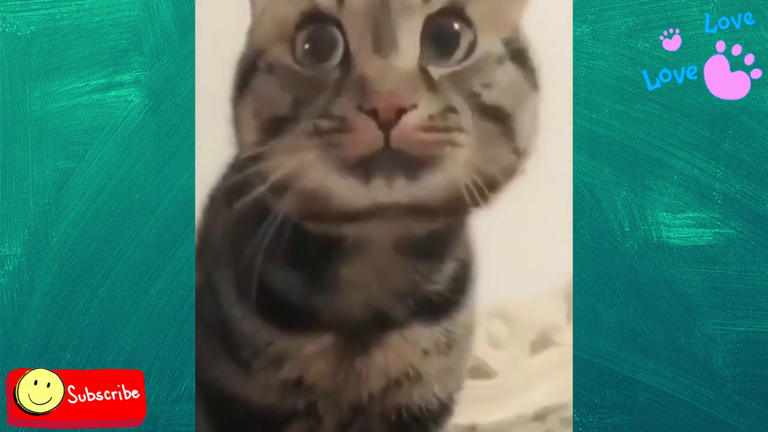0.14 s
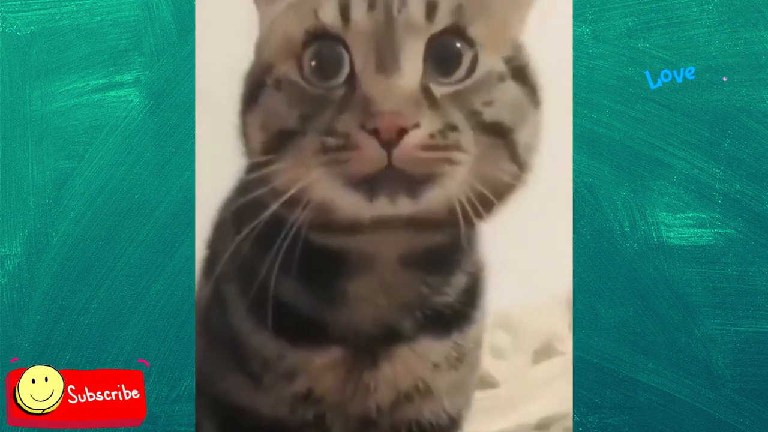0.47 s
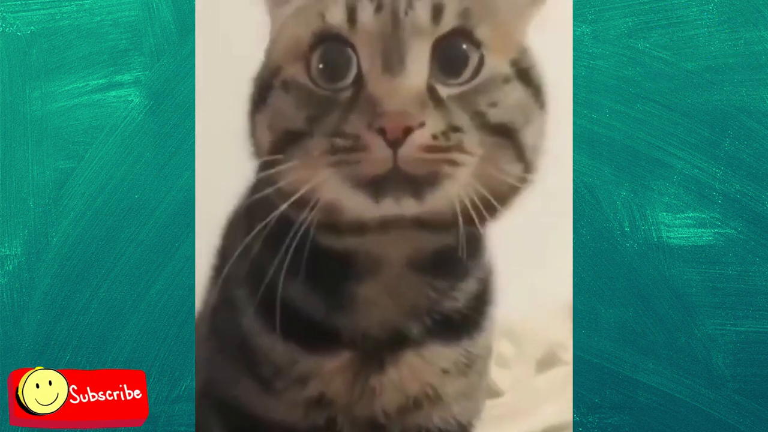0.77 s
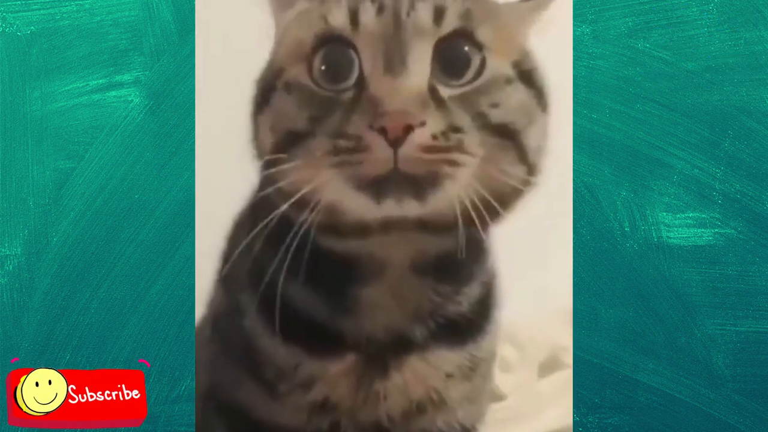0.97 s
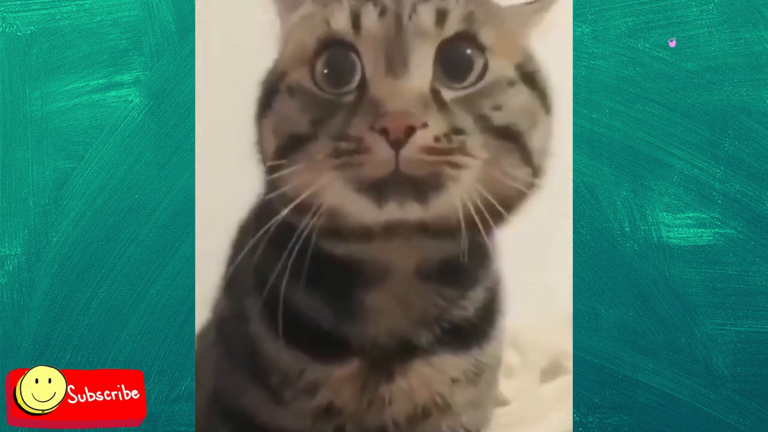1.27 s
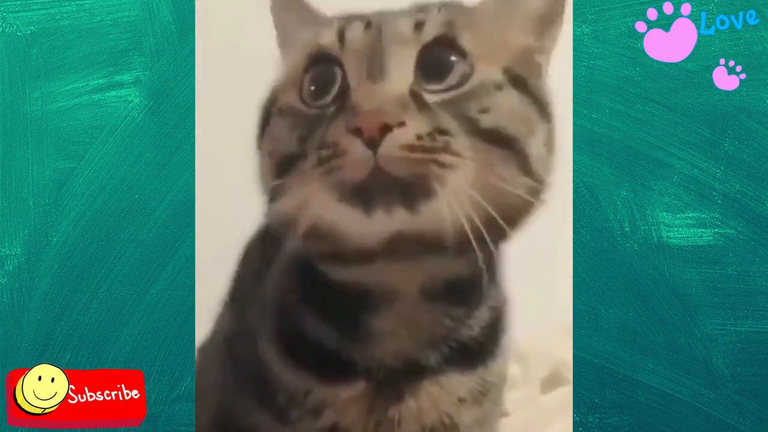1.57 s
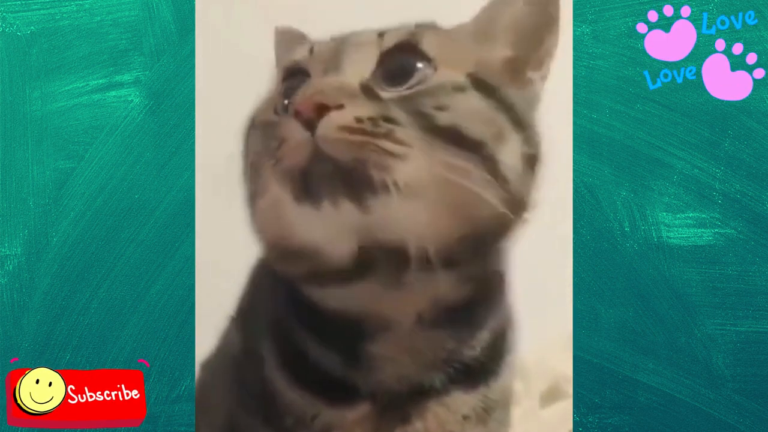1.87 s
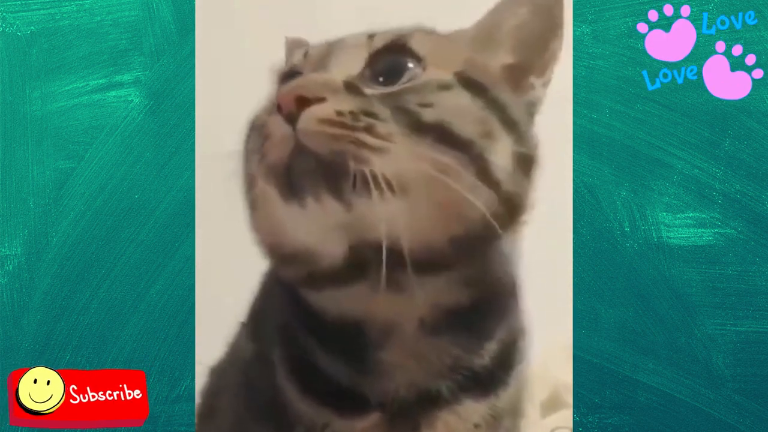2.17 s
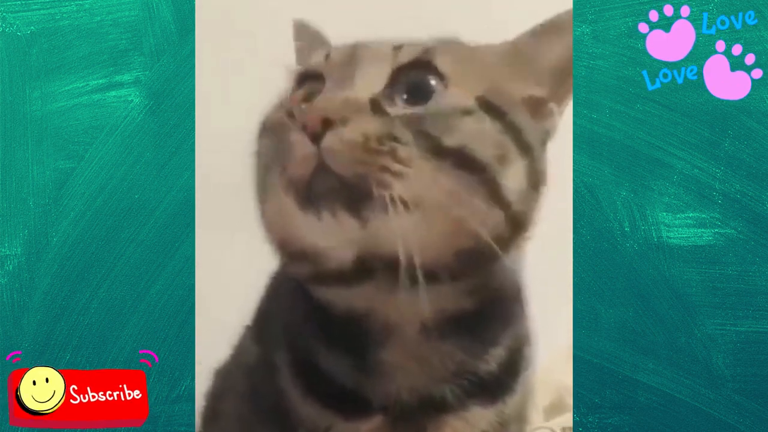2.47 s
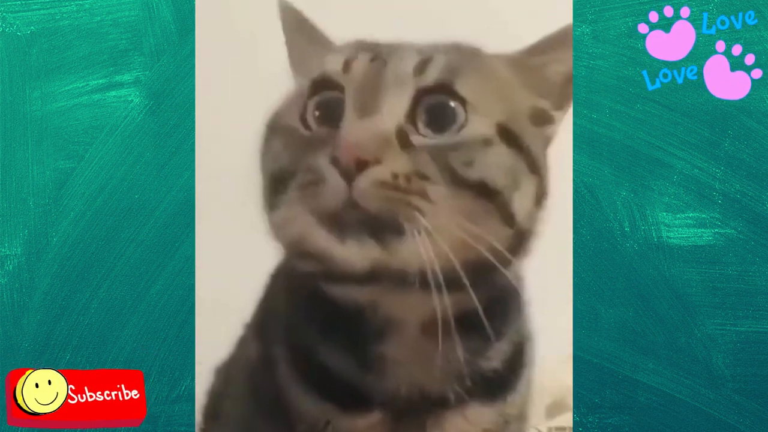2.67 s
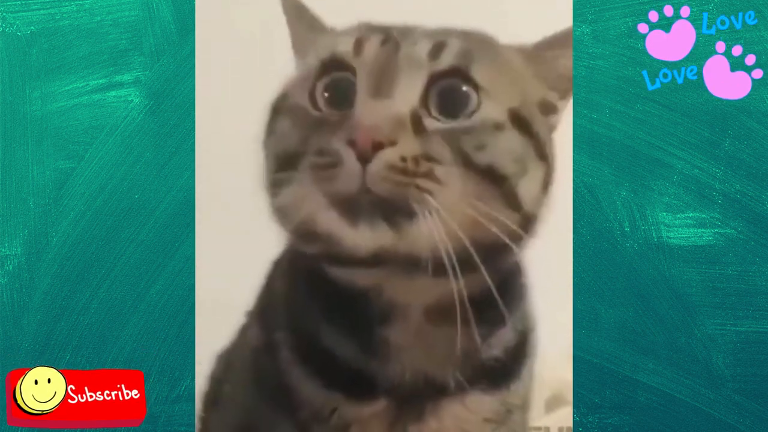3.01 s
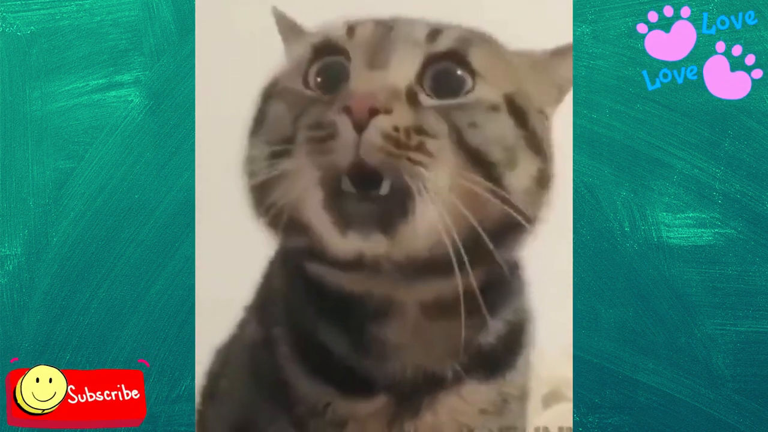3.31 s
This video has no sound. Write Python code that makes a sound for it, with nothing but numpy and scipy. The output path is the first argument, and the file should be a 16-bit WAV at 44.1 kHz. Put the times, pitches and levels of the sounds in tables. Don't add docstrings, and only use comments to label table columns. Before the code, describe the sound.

One drawn-out cat yowl, rough at first then almost pure, over faint echoing mews and hiss.

```python
import sys
import numpy as np
from scipy import signal
from scipy.fft import rfft, irfft, next_fast_len
from scipy.io import wavfile
from scipy.ndimage import uniform_filter1d, map_coordinates

SR = 44100
rng = np.random.default_rng(int(sys.argv[2]) if len(sys.argv) > 2 else 0)


def int16_out(signal):
    q = np.round(np.clip(np.atleast_2d(signal).T, -1, 1) * 32767)
    wavfile.write(sys.argv[1], SR, q.astype(np.int16))


def invert_db(level):
    return 10 ** (np.asarray(level, dtype=float) / 20)


N = 152145
T = np.arange(N) / SR
TOP_HZ = 14000


def unit(x):
    return x / np.sqrt(np.mean(x ** 2) + 1e-20)


def along(points):
    f, v = np.transpose(points)
    return lambda hz: invert_db(np.interp(np.log(hz + 1), np.log(f + 1), v, -120, -120))


def curves(rows):
    s, *cols = np.transpose(rows)
    return [np.interp(T, s, c) for c in cols]


def wobble(rate):
    return map_coordinates(rng.standard_normal(int(N * rate / SR) + 4), [T * rate])


def gate(start, stop, rise, fall):
    edge = np.minimum((T - start) / rise, (stop - T) / fall)
    return np.sin(np.pi / 2 * np.clip(edge, 0, 1)) ** 2


def filtered(x, response):
    m = next_fast_len(N + SR // 2)
    return irfft(rfft(x, m) * response(np.fft.rfftfreq(m, 1 / SR)), m)[:N]


def noise(response, patchy_db=0):
    z = signal.stft(rng.standard_normal(N), nperseg=1024)[2]
    field = uniform_filter1d(uniform_filter1d(rng.standard_normal(z.shape), 3, 0), 12, 1)
    patchy = signal.istft(z * invert_db(patchy_db * unit(field)), nperseg=1024)[1][:N]
    return unit(filtered(patchy, response))


def echoes(x, decay_s):
    tail = rng.standard_normal(SR) * invert_db(-60 * T[:SR] / decay_s)
    return signal.fftconvolve(x, tail / np.linalg.norm(tail))[:N]


def far_cats():
    # start in seconds, length in seconds, pitch in Hz, level in dB, second partial in dB
    mews = [(0, 0.091, 958, -33.5, -12), (0.043, 0.22, 1057, -31, -5.5), (0.306, 0.11, 1473, -28.5, -1.5),
            (0.468, 0.46, 1480, -45.5, -1), (1.329, 0.19, 1033, -48.5, 0), (1.331, 0.36, 891, -51.5, -5),
            (1.49, 0.21, 977, -46.5, 0.5), (1.635, .27, 1447, -35.5, 1.5), (1.871, 0.21, 1379, -38.5, 2),
            (1.748, 0.34, 912, -41, -1), (1.922, 0.25, 779.4, -35, -14), (2.065, 0.28, 885, -37.5, -18.5),
            (2.261, 0.34, 763.5, -38.5, -5), (2.624, 0.19, 880, -43.5, -6), (2.876, 0.12, 914, -43, 7),
            (3.098, 0.2, 884, -61.5, 9), (3.295, 0.12, 677, -39, -19), (3.299, .14, 714.7, -36, -26),
            (0.215, 0.075, 892, -39, -15), (2.381, 0.28, 1154, -61, 9), (2.196, 0.16, 1047, -47, 1)]
    # frequency in Hz, gain in dB
    far_colour = [(600, -41), (790, 0), (3000, -1), (3300, -13.5), (3600, -14), (4300, -15.5), (4550, -25),
                  (6000, -29)]
    # time in seconds, level in dB
    din_path = [(0, -41), (.4, -42.5), (.9, -48), (1.25, -62), (1.32, -49), (2, -38), (2.5, -43), (3, -51),
                (3.25, -65), (3.33, -48.5), (3.45, -51.5)]
    arch_depth, edge_s = .02, .022
    hoarse_waver = .012 * wobble(13) + .013 * wobble(70)
    swell_db = 3 * wobble(30)

    x = np.zeros(N)
    for s, length, hz, db, second_db in mews:
        arch = 1 - arch_depth * (2 * np.clip((T - s) / length, 0, 1) - .8) ** 2
        arch = arch + np.roll(hoarse_waver, rng.integers(N))
        turn = 2 * np.pi * np.cumsum(hz * arch) / SR
        partials_db = [0, second_db, -6, -16.5]
        tone = sum(invert_db(g) * np.sin(k * turn) for k, g in enumerate(partials_db, 1))
        level = invert_db(db + np.roll(swell_db, rng.integers(N)))
        x += level * gate(s - edge_s, s + length, edge_s, edge_s) * tone

    mewing = filtered(invert_db(-14) * x + echoes(x, decay_s=.5), along(far_colour))
    din = noise(lambda hz: along(far_colour)(hz) / (1 + (hz / 3900) ** 12), patchy_db=4)
    return mewing + invert_db(curves(din_path)[0]) * din


def house():
    # time in seconds, hum level in dB
    hum_path = [(0.0, -63), (0.19, -47.5), (1.08, -63), (2.47, -51), (2.5, -60.5), (2.82, -42.5),
                (3.2, -53.5), (3.45, -38)]
    # frequency in Hz, gain in dB per Hz
    hum_colour = [(15, -22), (30, -14), (40, -4), (48, 0), (56, -5), (64, -15), (90, -16), (125, -28)]
    air_colour = [(90, -15), (150, -3), (400, 0), (700, -4.5), (900, -30)]
    hiss_colour = [(3000, -20.5), (3600, -9), (6800, -5), (8200, -5.5), (9500, -9.5), (11000, -13),
                   (13900, -14.5)]
    # start in seconds, 30 dB decay in seconds, level in dB
    rustles = [
        (1.265, .2, -50),
        (1.84, .16, -58),
        (2.25, .5, -62),
        (2.55, .16, -64),
    ]
    # frequency in Hz, gain in dB per Hz
    rustle_colour = [(1200, -29.5), (2000, -11), (3000, -3), (4500, 7), (8000, -1.5), (13500, -11.5)]

    hum = invert_db(curves(hum_path)[0] + 3 * wobble(6)) * noise(along(hum_colour))
    air = invert_db(-61) * noise(along(air_colour), patchy_db=3)
    hiss_db = -63.5 - 8.5 * np.clip((T - 3.3) / .05, 0, 1)
    hiss = invert_db(hiss_db) * noise(along(hiss_colour), patchy_db=3)
    strokes = 0
    for s, decay_s, db in rustles:
        decay = invert_db(-30 * np.clip(T - s - .02, 0, 1) / decay_s)
        strokes = strokes + invert_db(db) * gate(s, s + decay_s, .03, .05) * decay
    return hum + air + hiss + strokes * noise(along(rustle_colour), patchy_db=1.5)


def chest():
    # time in seconds, pitch in Hz, level in dB, mouth opening in dB
    path = [(0.2, 157.5, -24.5, -6.5), (0.218, 163.9, -24.5, -7.5), (0.245, 176.8, -12, -8),
            (0.268, 193.6, -11.5, -9), (0.294, 209.3, -15, -5), (0.364, 232.5, -12, 3),
            (0.388, 249, -13, -4.5)]
    # partial number, level in dB
    partials = [(1, -1), (2, 0), (3, -17), (4, -17.5), (5, -12.5), (6, -28.5), (7, -34), (8, -27.5),
                (9, -29.5), (10, -50.5), (11, -26.5), (12, -24), (13, -22.5)]
    # frequency in Hz, gain in dB
    air_colour = [(3900, -28), (4500, -11), (6200, 2.5), (8800, -2), (9400, -21.5), (11000, -13.5),
                  (13500, -15.5)]
    rough_colour = [(100, -14.5), (300, 7), (1000, 2), (3000, -13), (3400, -48)]  # Hz, dB
    break_s = .008

    hz, db, open_db = curves(path)
    turn = 2 * np.pi * np.cumsum(hz * (1 + .006 * wobble(120))) / SR
    tone = 0
    for k, g in partials:
        partial_db = g
        if k == 1:
            partial_db = partial_db + .15 * (hz - 216.5)
        if k > 2:
            partial_db = partial_db + open_db + 2.5 * wobble(40)
        if k > 5:
            ring_db = 10 * np.exp(-((k * hz - 2060) / 150) ** 2)
            partial_db = partial_db + ring_db - 40 * np.maximum(.33 - T, 0)
        tone = tone + invert_db(partial_db) * np.cos(k * turn - np.pi / 2 * (k - 1))

    rough = .055 * noise(along(rough_colour))
    air = invert_db(-35 + open_db) * noise(along(air_colour), patchy_db=6.5)
    pulsed = (1 + np.cos(turn)) * (rough + air)
    window = gate(path[0][0] - .004, path[-1][0] + break_s / 2, .009, break_s)
    return invert_db(db) * window * (tone + pulsed)


def note():
    # time in seconds, pitch in Hz, level in dB, throat ring in dB, breath in dB
    path = [(0.39, 363.7, -7, -16.5, -61.5), (0.4, 372.4, -1.5, -17.5, -55), (0.44, 410.4, -7, -23, -52),
            (0.5, 433.7, -4, -27, -50), (0.62, 430, -8, -27.5, -50), (0.69, 425.5, -9, -33.5, -60),
            (0.91, 407.4, -10.5, -38, -60.5), (1.35, 358, -18.5, -57, -69.5),
            (1.37, 355.2, -19.5, -53, -63.5), (1.44, 352.1, -21.5, -53.5, -68.5),
            (1.69, 338, -21.5, -48, -74.5), (1.85, 334.3, -23, -46, -70.5),
            (2.13, 323.6, -17, -35.5, -64.5), (2.71, 337, -11, -31.5, -54), (2.82, 333, -11.5, -35, -54.5),
            (3.17, 311.4, -20, -30.5, -61), (3.26, 304.6, -25.5, -32.5, -59.5),
            (3.32, 310, -43.5, -63, -75.5)]
    # time in seconds, width in seconds, swell in dB
    swells = [(.79, 0.028, -1), (.86, 0.03, 1.2), (0.949, 0.038, -2), (1.049, 0.029, -0.2),
              (1.15, 0.048, -2), (1.23, 0.036, 0.5), (2.89, .035, -1.5)]
    # lead at low pitch in rad, lead at high pitch in rad, turning from Hz, span in Hz
    leads = [
        (1.4, 3.7, 345, 80),
        (2.3, 3.7, 400, 30),
    ]
    # partial number, level in dB, change in dB per second as the mouth closes
    upper_partials = [(4, -27, -61), (5, -29, -37.5), (6, -34.5, -31), (7, -39, -300), (8, -36, -500),
                      (9, -48, -500), (10, -52.5, -500), (11, -45.5, -500), (12, -47.5, -500),
                      (13, -47.5, -43.5)]
    # frequency in Hz, width in Hz, gain in dB
    mouth = [(2183, 64, 8), (2780, 37, 8)]
    # frequency in Hz, width in Hz, gain in dB
    nose = [(5400, 680, -7.5), (6816, 280, 8), (7950, 140, 2.5), (8380, 620, 3), (11300, 13000, -13.5)]
    # frequency in Hz, gain in dB
    rasp_colour = [(150, -30.5), (280, -7.5), (400, 1.5), (600, -16), (1000, -11.5), (1600, -40.5)]
    break_s, shimmer_db, loudest_db = .008, .5, -6.4

    hz, db, third_db, breath_db = curves(path)
    hz = uniform_filter1d(hz, size=400) * (1 + .0015 * wobble(30))
    turn = 2 * np.pi * np.cumsum(hz) / SR

    push_db = 1.2 * np.clip(db + 9.2, 0, 1)
    db = np.minimum(db + push_db, loudest_db) + .3 * wobble(7)
    db = db + sum(g * np.exp(-((T - s) / w) ** 2) for s, w, g in swells)
    second_lead, third_lead = [a + (b - a) * np.clip((hz - f) / span, 0, 1) for a, b, f, span in leads]

    second_db = -15.5 - 150 * np.maximum(.48 - T, 0) + shimmer_db * wobble(20)
    second = invert_db(second_db) * np.clip((2 * hz / 657.5) ** 12, 0, 1)
    upper = 0
    for k, g, fall in upper_partials:
        closed_db = -46 - 12 * max(k - 7, 0)
        partial_db = np.maximum(g + fall * np.maximum(T - .62, 0), closed_db)
        ring_db = sum(gain * np.exp(-((k * hz - c) / w) ** 2) for c, w, gain in mouth)
        ring_db = ring_db - 90 * np.maximum(.49 - T, 0)
        upper = upper + invert_db(partial_db + ring_db + 2.2 * wobble(16)) * np.sin(k * turn)
    tone = invert_db(db) * (np.cos(turn) + second * np.cos(2 * turn + second_lead) + upper)
    tone = tone + invert_db(third_db + shimmer_db * wobble(29)) * np.cos(3 * turn + third_lead)

    def nose_response(f):
        return sum(invert_db(g) / (1 + ((f - c) / w * 2) ** 4) for c, w, g in nose)

    air_level = invert_db(5 + breath_db + .21 * db)
    air = air_level * (1 + .4 * np.cos(turn)) * noise(nose_response, patchy_db=2)
    rasp = invert_db(-32.5 + db) * noise(along(rasp_colour), patchy_db=-3)
    window = gate(path[0][0] - break_s / 2, path[-1][0] + .014, break_s, .015)
    return window * (np.sqrt(2) * tone + air + rasp)


def scene():
    cat = filtered(chest() + note(), lambda hz: 1 / (1 + (120 / (hz + 1)) ** 8))
    room = invert_db(-26) * echoes(cat, decay_s=.55)
    return (cat + room + far_cats() + house())[None]


def thin_treble(x):
    dropouts = [1.525, 1.57, 2.265, 2.36, 3.22, 3.265]
    weak_hz, weak_share = 3200, .2

    def smooth(v):
        return uniform_filter1d(uniform_filter1d(v, size=7, axis=0), size=7, axis=1)

    hz, _, z = signal.stft(x, SR, nperseg=1024)
    db = 10 * np.log10(np.abs(smooth(np.abs(z) ** 2)) + 1e-20)
    db = db + 3.5 * unit(smooth(smooth(rng.standard_normal(z.shape))))
    db = db + 5 * hz[:, None] / TOP_HZ
    high = (hz > weak_hz) & (hz < TOP_HZ)
    muted = high[:, None] & (db < np.quantile(db[high], weak_share))
    x = signal.istft(z * ~muted, nperseg=1024)[1][:N]
    ducking = .85 * sum(np.exp(-((T - s) / .006) ** 2) for s in dropouts)
    return x - ducking * filtered(x, lambda f: f > weak_hz)


def band_limit(x):
    return signal.sosfilt(signal.butter(12, 14010, fs=SR, output="sos"), x)


def record(dry):
    # frequency in Hz, width in Hz, depth from 0 to 1
    mic_dips = [(3600, 420, .72), (7400, 220, .9), (9800, 700, .85), (6250, 130, .7)]
    top, knee = .565, 80

    def mic_response(hz):
        dips = [1 - np.clip(d, 0, 1) / (1 + ((hz - c) / w * 2) ** 4) for c, w, d in mic_dips]
        return np.prod(dips, axis=0)

    x = filtered(dry[0], mic_response)
    x = x / (1 + np.abs(x / top) ** knee) ** (1 / knee)
    mix = filtered(thin_treble(x), lambda hz: hz < TOP_HZ)[None]
    return band_limit(mix)


dry = scene()
out = record(dry)
int16_out(out)
```